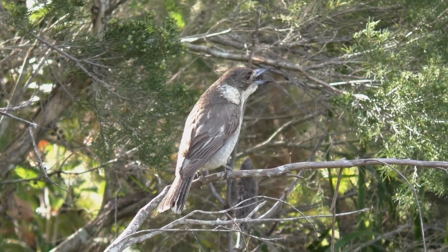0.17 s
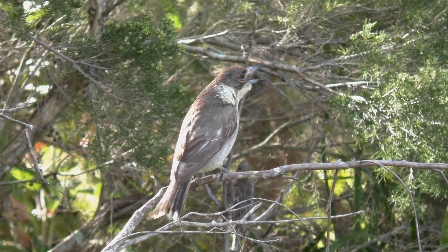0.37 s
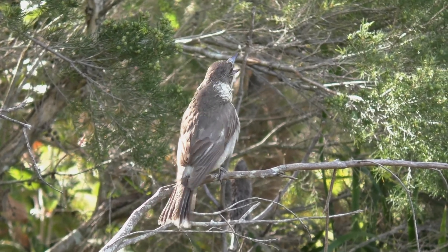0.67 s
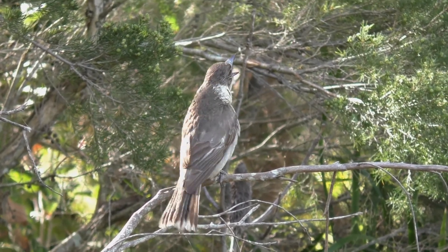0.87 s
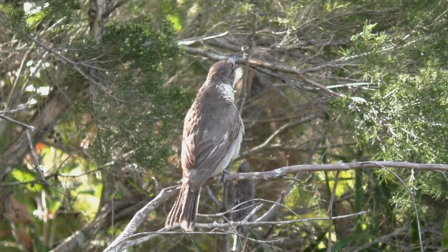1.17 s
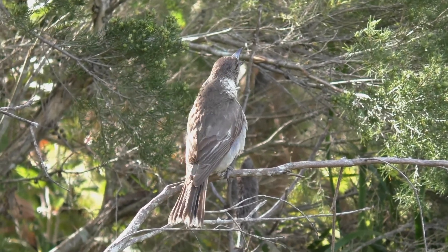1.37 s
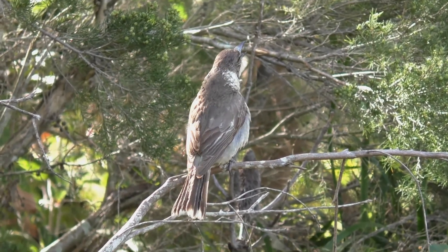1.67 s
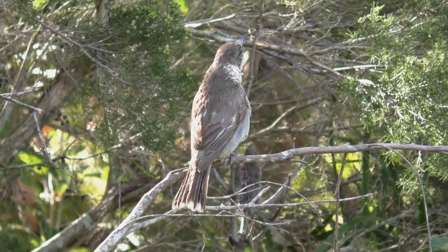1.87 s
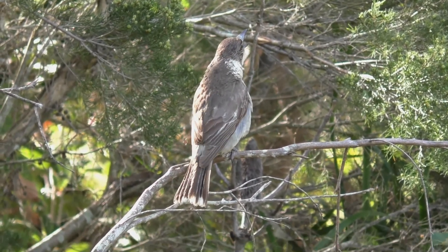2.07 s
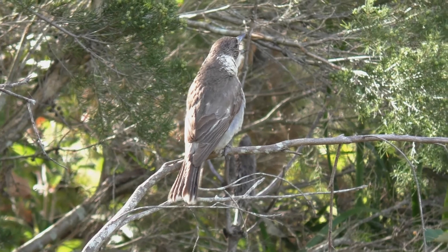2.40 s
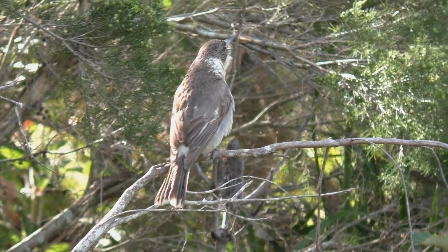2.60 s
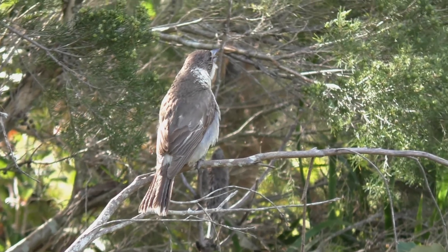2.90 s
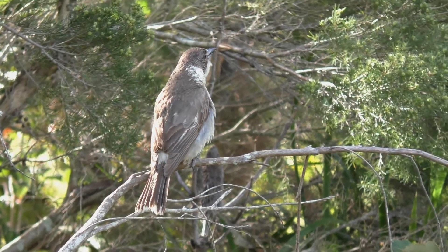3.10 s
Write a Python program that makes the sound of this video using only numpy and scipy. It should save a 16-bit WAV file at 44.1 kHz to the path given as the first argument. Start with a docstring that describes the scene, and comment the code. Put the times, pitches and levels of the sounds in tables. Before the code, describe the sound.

Two rasping bird calls, three bright whistles, four more rasps, three whistles and a last rasp, loud and near, ringing among trees over low traffic rumble and a far engine, recorded outdoors in stereo.

```python
"""Among trees near distant traffic: a butcherbird on a near branch alternates harsh calls and whistles.
Both are harmonics on moving pitches through a windpipe that rings near 1.6 kHz: a slow second
oscillation makes the calls buzz, a fast upsweep starts the whistles. Filtered noise adds breath and a bill click.
Delays and decaying noise make the trees' echoes. A second bird chirps further off as gliding sines;
a far engine, two harmonics, pulls through its gears over a rumble of shaped noise."""
import sys
import numpy as np
from scipy import signal
from scipy.fft import rfft, irfft, next_fast_len
from scipy.io import wavfile
from scipy.ndimage import map_coordinates

SR = 44100
rng = np.random.default_rng(int(sys.argv[2]) if len(sys.argv) > 2 else 0)


def unload_wav(signal):
    """Save mono or channel-first audio to the path in sys.argv[1] as 16-bit WAV at rate SR, clipped to [-1, 1]."""
    wavfile.write(
        sys.argv[1],
        SR,
        np.round(np.clip(np.atleast_2d(signal).T, -1, 1) * 32767).astype(np.int16),
    )


N = 143325
T = np.arange(N) / SR

# windpipe and beak resonances [f/Hz, gain/dB]
THROAT = [(760, -33), (1100, -18), (1330, -12.5), (1480, -1.5), (1590, 1), (1720, -0.5), (1900, -7.5),
          (2200, -17), (2500, -13.5), (2900, -15), (3900, -21), (4450, -11), (4900, -2), (5300, -30),
          (5900, -30), (7200, -11.5), (8400, -29.5), (10000, -27.5), (15000, -28)]
# harmonics of the harsh voice, from the fundamental up [level/dB]
RASP_PARTIALS_DB = [-2.5, -2, -5, -23.5, -33]
# spectrum of the breath noise in whistles and lead-ins [f/Hz, level/dB]
BREATH_SHAPE = [(1000, -52.5), (2000, 13.5), (4000, -7.5), (5800, -19.5), (7000, 4.5), (10000, 7),
                (13000, -6), (16000, -37)]
BREATH_DB = -29


def amp(db):
    """Decibels to gain."""
    return 10 ** (np.asarray(db) / 20)


def unit(x):
    """Scale to rms 1."""
    return x / np.sqrt(np.mean(x ** 2) + 1e-20)


def along(points, hz):
    """Interpolate (Hz, value) points on a log-frequency axis."""
    f, v = np.transpose(points)
    return np.interp(np.log(hz + 1), np.log(f + 1), v)


def wobble(rate_hz, size):
    """Smooth random curve, rate_hz knots a second."""
    knots = rng.standard_normal(size // 4 + 4)
    return map_coordinates(knots, [np.arange(size) * min(rate_hz / SR, 1 / 4)])


def coloured(x, points):
    """Minimum-phase (causal) filter with the given (Hz, dB) shape, via the folded cepstrum."""
    m = 2 * next_fast_len(x.shape[-1])
    cepstrum = irfft(np.log(amp(along(points, np.fft.rfftfreq(m, 1 / SR)))))
    cepstrum[1:m // 2] *= 2
    cepstrum[m // 2 + 1:] = 0
    response = np.exp(rfft(cepstrum))
    return irfft(rfft(x, m) * response)[..., :x.shape[-1]]


def clock(length_s):
    """Time within one note, in seconds."""
    return np.arange(int(length_s * SR)) / SR


def gate(t, length_s, attack_s, release_s):
    """Sine-squared attack, hold and release."""
    ramp = np.minimum(t / attack_s, (length_s - t) / release_s)
    return np.sin(np.pi / 2 * np.clip(ramp, 0, 1)) ** 2


def partials(pitch_hz, levels_db):
    """Harmonics on a pitch curve; 0 dB is rms 1."""
    phase = 2 * np.pi * np.cumsum(pitch_hz) / SR
    return np.sqrt(2) * sum(amp(db) * np.sin(k * phase) for k, db in enumerate(levels_db, 1))


def add(track, start_s, sound):
    """Mix a sound into the track."""
    i = round(start_s * SR)
    track[i:i + len(sound)] += sound[:N - i]


def rumble():
    """Traffic rumble: shaped stereo noise, its channels alike by band, its deep part swelling."""
    # spectrum [f/Hz, level/dB]
    spectrum = [(20, -28), (40, -13.5), (58, -6.5), (80, -7.5), (125, -0.5), (180, -2), (260, -6),
                (450, -7), (750, -16.5), (1300, -12), (2500, -21.5), (4000, -27.5), (13000, -34),
                (15500, -37)]
    # left-right correlation [f/Hz, correlation]
    alike = [(30, 0.41), (120, 0.89), (300, 0.69), (9000, 0.53)]
    # swell of the deep part; only the deviation from the mean level acts [t/s, level/dB]
    swell_course = [(0.0, -65.5), (0.03, -58.5), (0.87, -51), (0.98, -67), (1.01, -54.5), (3.25, -55.5)]
    level_db, wander_db = -49.5, 1.2
    correlation = along(alike, np.fft.rfftfreq(N, 1 / SR))
    angle = np.arccos(np.clip(correlation, -1, 1)) / 2
    noise = rfft(rng.standard_normal((2, N)))
    mid, side = irfft(noise * [np.cos(angle), np.sin(angle)], N)
    stereo = unit(coloured(np.array([mid + side, mid - side]), spectrum))
    stereo = stereo * amp(level_db + wander_db * wobble(4.84, N))
    deep = signal.sosfiltfilt(signal.butter(2, 130, fs=SR, output='sos'), stereo)
    s, swell_db = np.transpose(swell_course)
    swell_gain = amp(np.interp(T, s, swell_db - swell_db.mean()))
    return stereo + deep * (swell_gain - 1)


def far_engine():
    """Far engine: two harmonics rise in pitch through each gear, wavering in pitch and level."""
    # pulls [start/s, end/s, first pitch/Hz, last pitch/Hz, level/dB]
    pulls = [(-.2, 0.614, 139, 154.5, -48.5), (0.244, 1.656, 117, 145.2, -49.5),
             (2.721, 3.45, 147, 166, -49)]
    # harmonics [level/dB]
    engine_partials_db = [-1.5, -27.5]
    fade_s = 0.15
    engine = np.zeros(N)
    for start, end, hz0, hz1, db in pulls:
        pitch = hz0 + (hz1 - hz0) * (T - start) / (end - start)
        pitch = pitch * (1 + 0.0072 * wobble(11, N))
        level = amp(db + 2.4 * wobble(9.4, N))
        engine += partials(pitch, engine_partials_db) * gate(T - start, end - start, fade_s, fade_s) * level
    return engine


def far_bird():
    """Thin chirps: single sines that rise ever faster."""
    # chirps [end/s, length/s, level/dB]
    chirps = [(2.586, 0.06, -62), (2.722, 0.058, -46), (2.847, 0.048, -49.5), (2.974, 0.044, -44.5),
              (3.117, .052, -44.5), (3.264, 0.065, -47)]
    low_hz, top_hz, bend = 2254, 4365, 1.8
    out = np.zeros(N)
    for end, length, db in chirps:
        t = clock(length)
        pitch = low_hz + (top_hz - low_hz) * (t / length) ** bend
        pitch = pitch * (1 + 0.018 * wobble(682, len(t)))
        add(out, end - length, partials(pitch, [db]) * gate(t, length, 0.012, 0.014))
    return out


def bill_snap():
    """One click of the bill: a decaying burst of shaped noise."""
    start_s, level_db, t60_s = 1.612, -31, 0.022
    out, t = np.zeros(N), clock(0.025)
    noise = rng.standard_normal(len(t))
    click = unit(coloured(noise, [(200, -10.5), (2000, 3), (5000, -17.5), (14000, -30.0)]))
    add(out, start_s, click * amp(level_db - 60 * t / t60_s))
    return out


def lead_ins():
    """Short low notes that lead into whistles: the harsh voice's harmonics, with breath."""
    # notes, level ahead of the windpipe [start/s, length/s, first pitch/Hz, last pitch/Hz, level/dB]
    notes = [(.675, 0.018, 912, 964, -23), (0.797, 0.01, 997, 1237, -21), (0.924, 0.022, 847, 957, -24),
             (2.613, 0.021, 953, 909, -24)]
    breath_trim_db = -4
    voice, breath = np.zeros(N), np.zeros(N)
    for start, length, hz0, hz1, db in notes:
        t = clock(length)
        pitch = (hz0 + (hz1 - hz0) * t / length) * (1 + 0.025 * wobble(600, len(t)))
        effort = amp(db) * gate(t, length, 0.0052, 0.003)
        add(voice, start, effort * partials(pitch, RASP_PARTIALS_DB))
        air = unit(coloured(rng.standard_normal(len(t)), BREATH_SHAPE))
        add(breath, start, effort * amp(breath_trim_db) * air)
    return coloured(voice, THROAT) + amp(BREATH_DB) * breath


def whistles():
    """A tone sweeps up through the windpipe's resonance, flashing as it passes, and holds; rough ones hiss."""
    # whistles, level ahead of the windpipe [start/s, length/s, low pitch/Hz, top pitch/Hz,
    # sweep middle after start/s, sweep time constant/s, level/dB, overtone trim/dB,
    # pitch drift after the sweep middle/(share per s), roughness 0-1]
    notes = [(0.689, 0.079, 1188, 2498, 0.0084, 0.0038, -15, -1, 0, 1),
             (0.803, 0.061, 1327, 2488, 0.011, .0035, -16, -0.5, 0.5, 0.57),
             (0.948, 0.082, 1522, 2577, .022, 0.00381, -14.5, -2, -0.83, 0.55),
             (2.368, 0.072, 1366, 2374, 0.0065, 0.0012, -14.5, -1.5, 0.42, 0.57),
             (2.484, .061, 1153, 2346, 0.0082, 0.0053, -15.5, -5.5, 1, 0.94),
             (2.639, 0.075, 1497, 2181, .019, 0.0037, -15.5, -3, 2, 1.0)]
    # harmonics; overtones before their trim [level/dB]
    whistle_partials_db = [-4.5, -14.5, -17.5, -13, -17, -35]
    attack_s, release_s, breath_fade_s = 0.0053, 0.0085, .04
    jitter, waver = .012, .008  # shares of pitch
    shimmer_db, sweep_gain_db = 2.6, 1
    first_db, *overtones_db = whistle_partials_db
    voice, breath = np.zeros(N), np.zeros(N)
    for start, length, low_hz, top_hz, middle, sweep, db, overtone_db, drift, rough in notes:
        t = clock(length)
        n = len(t)
        risen = 1 / (1 + np.exp((middle - t) / sweep))
        flutter = rough * risen * jitter * wobble(600, n) + waver * wobble(67, n)
        pitch = low_hz + (top_hz - low_hz) * risen
        pitch = pitch * (1 + flutter + drift * np.maximum(t - middle, 0))
        shimmer = rough * shimmer_db * risen * wobble(258, n)
        effort = amp(db + sweep_gain_db * (risen - 0.5) + shimmer) * gate(t, length, attack_s, release_s)
        levels_db = [first_db, *(np.array(overtones_db) + overtone_db)]
        add(voice, start, effort * partials(pitch, levels_db))
        air = unit(coloured(rng.standard_normal(n), BREATH_SHAPE))
        near_sweep = np.exp(-np.abs(t - middle) / breath_fade_s)
        add(breath, start, rough * effort * risen * near_sweep * air)
    return coloured(voice, THROAT) + amp(BREATH_DB) * breath


def upper_resonances(pitch, throb, t, upper, buzz_hz, bill):
    """Treble of a harsh call: throbbing harmonics and noise in three bands; the bill tunes the highest."""
    # band shapes, low, middle, high; the high one before bill tuning [f/Hz, level/dB]
    band_shapes = [
        [(3000, -26), (4200, -25), (4550, 4.5), (4750, 0), (5100, -8), (6000, -28.5)],
        [(4600, -33), (5900, 1.5), (6750, 9), (7700, -12), (8500, 1.5), (9800, -39.5)],
        [(7000, -8), (8800, -15), (9900, 0.5), (11200, -9.5), (12500, -23), (15500, -35)],
    ]
    trim_db, noise_db, grain_db, surge_db = -1, -9, 3.2, 1.4
    n = len(pitch)
    fizz = unit(partials(pitch, np.zeros(16))) + amp(noise_db) * rng.standard_normal(n)
    fizz = fizz * throb
    s, *levels = np.transpose(upper)
    treble = np.zeros(n)
    for shape, level_db, shift in zip(band_shapes, levels, (1, 1, bill)):
        grain = amp(grain_db * wobble(2 * buzz_hz, n) + surge_db * wobble(45, n))
        band = unit(coloured(fizz * grain, np.array(shape) * [shift, 1]))
        treble += band * amp(trim_db + np.interp(t, s, level_db))
    return treble


def rasps():
    """A slow second oscillation shakes pitch and strength, stopping just before a clean upward flick."""
    # calls, levels before trim and windpipe [first level/dB, last level/dB, buzz/Hz, roughness 0-1,
    # bill tuning of the highest resonance/ratio]
    calls = [(-30, -19, 170, 0.783, 0.984), (-25.5, -20.5, 171, 0.93, 0.99), (-21.5, -19, 163, 0.69, .9),
             (-20.5, -20.5, 157, 0.787, 1.045), (-22, -21, 155, 0.9, .92), (-22, -21, 160, 0.84, 0.925),
             (-23.5, -20, 147, 0.78, 0.8)]
    # pitch course of each call, before the shake [t/s, f/Hz]
    pitch_courses = [
        [(.130, 512), (.235, 724), (.32, 779), (.381, 843), (.398, 1330)],
        [(.478, 782), (.565, 842), (.592, 1122), (.603, 1594), (.616, 1930)],
        [(1.108, 692.5), (1.132, 779), (1.2, 760.5), (1.271, 816.4), (1.287, 1195)],
        [(1.394, 749), (1.55, 770.5), (1.6, 810), (1.629, 1011), (1.643, 1410)],
        [(1.752, 700), (1.91, 708.2), (2.0, 800), (2.024, 1034)],
        [(2.118, 764.3), (2.235, 819), (2.26, 1071), (2.267, 1333), (2.278, 1368), (2.283, 1597), (2.294, 1580)],
        [(2.806, 766.6), (2.944, 767.7), (2.966, 905), (2.979, 1265)],
    ]
    # upper resonances of each call, before trim [t/s, low level/dB, middle level/dB, high level/dB]
    upper_courses = [
        [(0.15, -85, -74, -90), (0.22, -83, -66, -61.5), (0.304, -59, -70, -50), (0.395, -61.5, -66, -49)],
        [(0.49, -69, -55.5, -58), (0.512, -54, -53.5, -47.5), (0.586, -56.5, -59, -51),
         (0.598, -46.5, -55.5, -42), (0.615, -69, -65, -55)],
        [(1.12, -59, -51.5, -65), (1.2, -58.5, -52.5, -58.5), (1.28, -81, -55.5, -63.5)],
        [(1.405, -43.5, -59, -79), (1.427, -43.5, -53, -75.5), (1.515, -52.5, -57.5, -71),
         (1.569, -66, -51, -61), (1.64, -84, -55, -52.5)],
        [(1.765, -57.5, -62.5, -78), (1.799, -47.5, -61, -78), (1.913, -48.5, -58.5, -74),
         (1.975, -75, -50.5, -51.5), (2.02, -79, -52.5, -58.5)],
        [(2.13, -73, -58, -72), (2.156, -61, -55.5, -63), (2.168, -55.5, -55.5, -64.5), (2.278, -77, -49, -49),
         (2.29, -71, -57, -64)],
        [(2.815, -67, -56, -90), (2.839, -62, -63.5, -60.5), (2.873, -51, -57.5, -60),
         (2.911, -59.5, -57.5, -72), (2.975, -77, -61.5, -57)],
    ]
    # harmonics in the flick, where the fundamental takes over [level/dB]
    flick_partials_db = [4, -9, -27.5, -28, -28.5]
    flick_from_hz, flick_to_hz = 900, 1390
    buzz_swing, jitter, pitch_wander = .08, .02, .016  # shares of pitch
    buzz_depth, buzz_overtone, surge_db = .45, .35, 1.4
    clear_s, clearing_s, clear_push_db = .028, .006, 2  # buzz stops clear_s before the end
    attack_s, release_s, upper_release_s = .022, 0.0035, .008
    trim_db, noise_db, fade_s, fade_db = -1, -5.5, 0.038, 6
    open_db, brightening = -51, 0.37  # overtones follow the high resonance by this share of its dB
    low, high = np.zeros(N), np.zeros(N)
    for (db0, db1, buzz_hz, rough, bill), course, upper in zip(calls, pitch_courses, upper_courses):
        times, hz = np.transpose(course)
        start, length = times[0], times[-1] - times[0]
        t = clock(length)
        n = len(t)
        to_end = t - length
        note = np.interp(start + t, times, hz)

        shake = rough / (1 + np.exp((to_end + clear_s) / clearing_s))
        cycle = 2 * np.pi * np.cumsum(buzz_hz * (1 + .035 * wobble(110, n))) / SR
        buzz = np.sin(cycle) + buzz_overtone * np.sin(2 * cycle)
        buzz = buzz * amp(surge_db * wobble(buzz_hz, n))
        bend = buzz_swing * buzz + jitter * wobble(900, n) + pitch_wander * wobble(70, n)
        pitch = note * (1 + shake * bend)
        throb = 1 + shake * buzz_depth * np.cos(cycle)

        s, *levels = np.transpose(upper)
        bright_db = brightening * (np.interp(start + t, s, levels[-1]) - open_db)
        # the third harmonic and up brighten
        harsh_db = [db + bright_db * (k >= 2) for k, db in enumerate(RASP_PARTIALS_DB)]
        flick = np.clip((note - flick_from_hz) / (flick_to_hz - flick_from_hz), 0, 1)
        voice = (1 - flick) * partials(pitch, harsh_db) + flick * partials(pitch, flick_partials_db)
        air_shape = [(500, -17), (1200, -4), (2300, 1), (3300, -24.5), (8000, -31.5)]
        air = unit(coloured(rng.standard_normal(n), air_shape))
        voice = voice + shake * amp(noise_db + bright_db) * air

        # the voice weakens towards the end, with a push as the buzz stops
        effort_db = trim_db + db0 + (db1 - db0) * t / length - fade_db * np.exp(to_end / fade_s)
        push = np.exp(-((to_end + clear_s) / (2 * clearing_s)) ** 2)
        effort_db = effort_db + clear_push_db * np.maximum(1 - 2 * flick, 0) * push
        effort_db = effort_db + shake * surge_db * wobble(buzz_hz / 2, n)
        add(low, start, voice * throb * gate(t, length, attack_s, release_s) * amp(effort_db))

        treble = upper_resonances(pitch, throb, start + t, upper, buzz_hz, bill)
        add(high, start, treble * gate(t, length, attack_s, upper_release_s))
    return coloured(low, THROAT) + high


def delayed(x, delay_s):
    """Delay by a fractional number of samples."""
    return np.interp(T - delay_s, T, x, left=0)


def trunk_echoes(bird):
    """Two single reflections: a plain one, and one from a farther trunk that favours the held whistles."""
    # reflection of the farther trunk [f/Hz, gain/dB]
    far_trunk = [(1600, -25), (2500, -15), (3000, -34), (4400, -28), (4950, -7), (6000, -22)]
    near = amp(-17) * delayed(bird, .0322)
    return near + delayed(coloured(bird, far_trunk), .072)


def scatter(x, decay):
    """Diffuse stereo reflections: convolution with noise whose bands die at their own (Hz, t60 s)."""
    spread = .62
    hz, t, z = signal.stft(rng.standard_normal((2, SR)), SR, nperseg=256)
    fall = amp(-60 * t / along(decay, hz)[:, None])
    mid, side = signal.istft(z * fall, SR, nperseg=256)[1]
    tail = np.array([mid + spread * side, mid - spread * side])
    return signal.fftconvolve(x[None], tail / np.linalg.norm(tail[0]), axes=1)[:, :N]


def scene():
    """Rumble, engine and far bird behind the near bird with its echoes from trunks and foliage."""
    # extra treble towards the trees, where the bill points [f/Hz, gain/dB]
    turned_away = [(3500, 1), (7000, 4), (10000, 12), (15000, 17)]
    # reverberation of the trees [f/Hz, t60/s]
    trees = [(500, .5), (1600, .58), (3800, .45), (4950, .8), (6300, .42), (14000, .3)]
    foliage_db, foliage_t60_s, wood_db, pan_db = -17, 0.31, -11.5, -0.03
    background = rumble() + far_engine()
    other = far_bird()
    bird = bill_snap() + lead_ins() + whistles() + rasps()
    outward = coloured(bird, turned_away)
    foliage = amp(foliage_db) * scatter(outward, [(1000, foliage_t60_s)])
    wood = scatter(amp(wood_db) * outward + other, trees)
    direct = bird * amp([[pan_db], [-pan_db]])
    return background + other + wood + foliage + trunk_echoes(bird) + direct


def record(dry):
    """Remove everything from the band limit up."""
    top_hz = 15750
    return irfft(rfft(dry) * (np.fft.rfftfreq(N, 1 / SR) < top_hz), N)


dry = scene()
out = record(dry)
unload_wav(out)
```